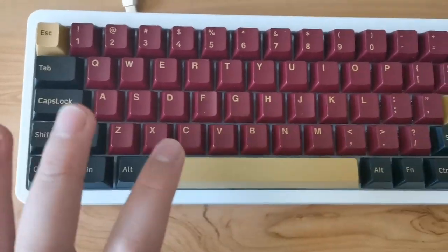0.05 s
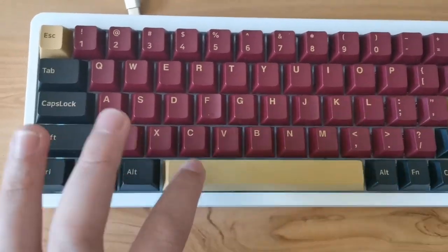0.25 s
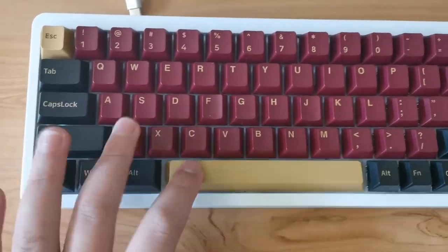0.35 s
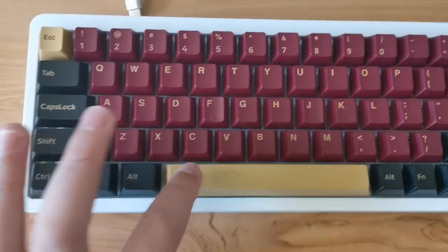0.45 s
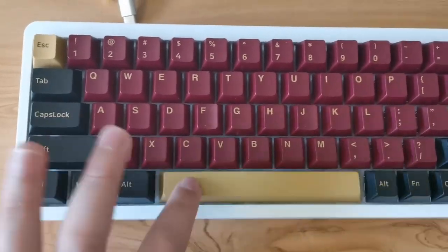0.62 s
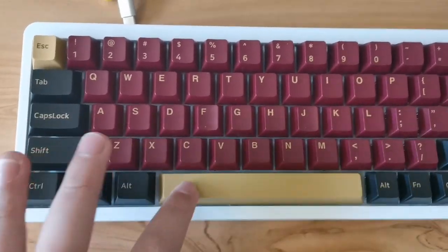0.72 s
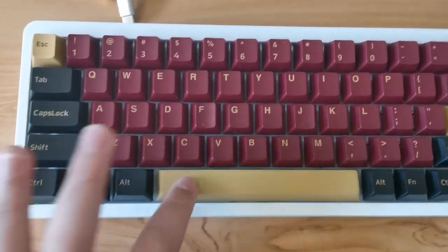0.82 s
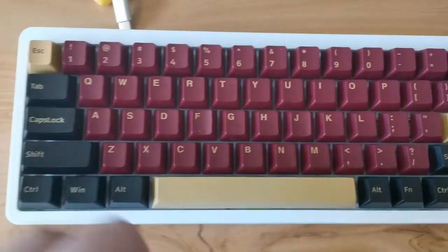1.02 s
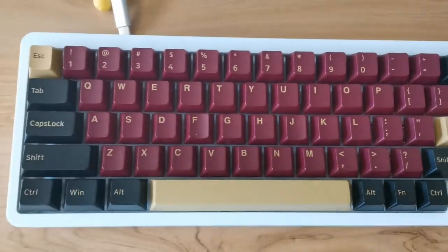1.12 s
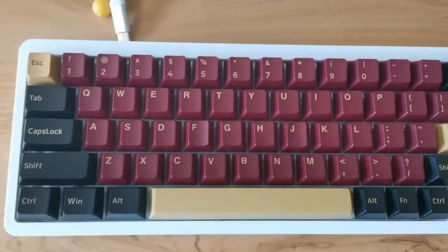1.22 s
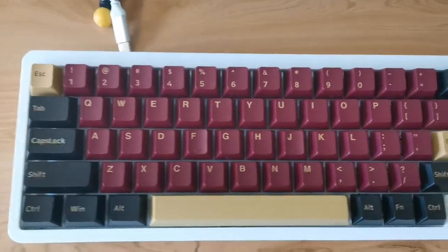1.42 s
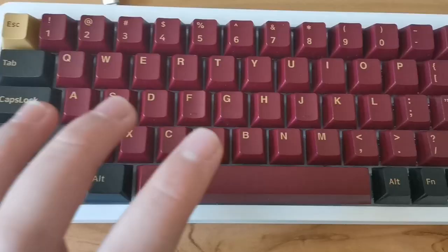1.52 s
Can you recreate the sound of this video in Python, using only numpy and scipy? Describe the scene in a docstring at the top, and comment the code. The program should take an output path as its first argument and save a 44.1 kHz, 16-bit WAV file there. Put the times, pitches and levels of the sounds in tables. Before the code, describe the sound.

A mechanical keyboard's spacebar is tapped four times, close to the microphone. Each press gives a sharp plastic clack with a slight desk thud, then a lighter click on release, in a small, quiet, slightly echoing room.

```python
"""A small live room rings out from an earlier tap, then a finger taps a keyboard's spacebar four times.
Each mechanical press, heard close up, ticks and bottoms out: a plastic crack, a short ring of bar,
plate and case, and a thud in the wooden desk. On each release the spring knocks the bar against its top
stop. Under it lies quiet room tone; as the hand lifts, skin brushes faintly and a soft low rush swells."""
import sys
import numpy as np
from scipy import signal
from scipy.fft import rfft, irfft
from scipy.io import wavfile

SR = 44100
rng = np.random.default_rng(int(sys.argv[2]) if len(sys.argv) > 2 else 0)


def waveform_to_disk(signal):
    """Save audio, clipped to [-1, 1], as 16-bit WAV at the path in sys.argv[1]."""
    frames = np.transpose(np.atleast_2d(signal))
    scaled = np.clip(frames, -1, 1) * 32767
    samples = np.round(scaled).astype(np.int16)
    wavfile.write(sys.argv[1], SR, samples)


N = 68355

# the bar bottoms out: (time [s], level [dB], brightness [dB/octave])
PRESSES = [(-.115, 1, -1), (0.2169, -2, 1), (0.4042, 0, 1), (0.698, -0.5, 0.5), (0.908, 0, 0.67)]
# the bar hits its top stop: (time [s], level [dB], brightness [dB/octave])
RELEASES = [(-.02, -1, 1), (0.3036, -0.5, -2), (0.5151, 0.5, -2.5), (0.8126, 1.5, -1.5), (1.0038, 3, -1)]
# ring of bar, plate and case:
# (frequency [Hz], t60 [s], press level [dB], release level [dB], left minus right [dB])
BODY_MODES = [(542, 0.034, -42, -48.5, 5), (683, 0.037, -28.5, -59, -2), (800, 0.033, -26.5, -44, -4.5),
              (914, 0.022, -32, -47.5, -17), (1103, 0.02, -19, -36, 0), (1358.4, 0.019, -17.5, -28.5, -8.5),
              (1491, 0.017, -15.5, -26, -10), (1758, 0.024, -18, -27, 3), (1924, 0.013, -22, -36.5, -15.5),
              (2143, .012, -20, -29, -14.5), (2525, 0.016, -23, -31, -4), (2900, 0.018, -22, -31, 7),
              (3517, 0.024, -36, -41.5, -4), (4485, 0.015, -33, -34.5, -6.5)]
# thud of the desk: (frequency [Hz], t60 [s], press level [dB], release level [dB])
DESK_MODES = [(95, 0.36, -53, -58.5), (132, 0.2, -52.5, -49.5), (216.5, 0.18, -43, -49),
              (265, 0.19, -47, -49.5), (330.4, 0.21, -43.5, -47)]
# crack of plastic on plastic: (frequency [Hz], relative level [dB])
CRACK_SPECTRUM = [(400, -27), (1000, -2.5), (2800, 1.5), (3600, -4.5), (4300, 1.5), (5300, -12.5),
                  (6000, -3.5), (7600, -7), (8600, -11.5), (10000, -5), (12500, -10.5), (16000, -26)]
# tick of the switch: (frequency [Hz], relative level [dB])
TICK_SPECTRUM = [(500, -24.5), (2200, -2.5), (4500, 0), (6500, -9.5), (12500, -7), (16000, -13.5)]
# colour of the reverb: (frequency [Hz], relative level [dB])
REVERB_SPECTRUM = [(80, -46), (250, -1), (450, -3), (800, -2.5), (1500, -4), (2400, 0), (2900, -0.5),
                   (3700, 1), (4800, 4), (6500, 3.5), (10000, -2), (15000, -10)]
# brushes of skin: (peak time [s], length [s], level [dB], centre [Hz], half-width [octaves])
BRUSHES = [(1.197, 0.096, -86, 11100, 0.13), (1.308, 0.052, -77, 11240, 0.34),
           (1.432, 0.059, -70.5, 4940, .04), (1.446, 0.0069, -67, 1770, 0.56),
           (1.466, 0.15, -81, 10500, 0.14)]
# soft low rush: (frequency [Hz], relative level [dB])
RUSH_SPECTRUM = [(30, 7), (70, 1.5), (190, -17.5), (255, 9.5), (390, -28.5), (520, -6.5), (980, 1),
                 (1300, -22), (3000, -12.5), (5000, -37.5), (14000, -52.5)]
# swell of the rush: (time [s], level [dB])
RUSH_SWELL = [(.95, -89.5), (1.15, -80), (1.26, -62), (1.35, -57), (1.5, -56.5)]
# steady room tone: (frequency [Hz], relative level [dB])
ROOM_TONE_SPECTRUM = [(25, -12), (60, -2.5), (110, -1.5), (190, -5.5), (260, 1.5), (400, -8.5), (600, -3),
                      (1200, -15), (2800, -21.5), (4000, -24.5), (7000, -34), (15000, -46.5)]

TICK_DB, TICK_LEAD_S, TICK_T60_S = -43, .0054, 0.043
PRESS_CRACK_DB, RELEASE_CRACK_DB, CRACK_T60_S, CRACK_PAN_DB = -24.5, -39.5, 0.018, 0.5
CRACK_FRESH = 0.49  # gain of the crack noise that is new on every hit
MODE_SCATTER_DB, MODE_DETUNE, DESK_DETUNE = .4, .004, .01  # random spread from hit to hit
RIGHT_LAG_S, LAG_FROM_HZ = 0.00036, 1190  # highs reach the right late; lows come from the whole case
RADIATION_HZ = 424  # the small bar radiates little below this
ATTACK_S, DESK_RISE_S = .00008, .01
TAIL_DB, TAIL_T60_S, TREBLE_T60_S, TAIL_PREDELAY_S, TAIL_BUILD_S = -8, 0.5, 0.51, 0.0046, .025
ECHO_DB, ECHO_S, ECHO_WIDTH_S = -9.5, 0.012, .003
ROOM_TONE_DB = -56.5
PREROLL_S, STOP_S, TOP_HZ = .2, 1.507, 16000


def spacebar(t):
    """All presses and releases; each kind of hit keeps its own grain of dense high modes."""
    out, size = np.zeros((2, len(t))), 2 ** 14
    for stroke, hits in ((press, PRESSES), (release, RELEASES)):
        grain = noise(CRACK_SPECTRUM, size)
        for start, db, brightness in hits:
            first = np.searchsorted(t, start - .01)  # open early for the tick
            span = slice(first, first + size)
            out[:, span] += undb(db) * stroke(t[span] - start, grain, brightness)
    return out


def press(t, grain, brightness):
    """The switch ticks faintly, then the bar lands."""
    tick = undb(TICK_DB) * noise(TICK_SPECTRUM, len(t)) * envelope(t + TICK_LEAD_S, TICK_T60_S)
    return tick + knock(t, grain, brightness, PRESS_CRACK_DB, level_column=0)


def release(t, grain, brightness):
    """The spring throws the bar back against its stop."""
    return knock(t, grain, brightness, RELEASE_CRACK_DB, level_column=1)


def knock(t, grain, brightness, crack_db, level_column):
    """One hit: ring and crack of the plastic, thin in the bass, over the thud of the desk."""
    plastic = body_ring(t, brightness, level_column) + crack(t, grain, crack_db + brightness)
    low_cut = signal.butter(2, RADIATION_HZ, "highpass", fs=SR, output="sos")
    return signal.sosfilt(low_cut, plastic) + desk_thud(t, level_column)


def body_ring(t, brightness, level_column):
    """Bar, plate and case ring in short modes of alternating polarity."""
    out = 0
    for k, (hz, t60, *levels, pan_db) in enumerate(BODY_MODES):
        tilt_db = brightness * np.log2(hz / 1500)
        db = levels[level_column] + tilt_db + MODE_SCATTER_DB * rng.standard_normal()
        lag = RIGHT_LAG_S / (1 + (LAG_FROM_HZ / hz) ** 4)
        mode = ring(lag_right(t, lag), hz * (1 + MODE_DETUNE * rng.standard_normal()), t60)
        out = out + (-1) ** k * undb(db) * pan(pan_db) * mode
    return out


def crack(t, grain, db):
    """Plastic meets plastic in a snap of noise: part repeating grain, part new."""
    burst = np.sqrt(1 - CRACK_FRESH ** 2) * grain + CRACK_FRESH * noise(CRACK_SPECTRUM, len(t))
    return undb(db) * pan(CRACK_PAN_DB) * burst * envelope(lag_right(t, RIGHT_LAG_S), CRACK_T60_S)


def desk_thud(t, level_column):
    """The desk's low modes bloom more slowly and outlast the plastic."""
    thud = sum(undb(levels[level_column]) * ring(t, hz * (1 + DESK_DETUNE * rng.standard_normal()), t60)
               for hz, t60, *levels in DESK_MODES)
    return thud * (1 - np.exp(-np.maximum(t, 0) / DESK_RISE_S))


def room(x):
    """The small room answers with a cluster of early reflections and a diffuse tail."""
    t = np.arange(2 ** 15) / SR
    wash = diffuse(noise(REVERB_SPECTRUM, len(t)), wide_hz=516)
    low = signal.sosfiltfilt(signal.butter(2, 5000, fs=SR, output="sos"), wash)
    tail = low * envelope(t, TAIL_T60_S) + (wash - low) * envelope(t, TREBLE_T60_S)
    tail *= np.clip((t - TAIL_PREDELAY_S) / TAIL_BUILD_S, 0, 1)
    echoes = diffuse(noise(REVERB_SPECTRUM, len(t)), wide_hz=503)
    echoes *= np.exp(-.5 * ((t - ECHO_S) / ECHO_WIDTH_S) ** 2)
    response = sum(undb(db) * part / np.sqrt(np.sum(part ** 2) / 2)
                   for db, part in ((TAIL_DB, tail), (ECHO_DB, echoes)))
    send = .5 * x.mean(axis=0) + .5 * x  # half the stereo width
    return signal.fftconvolve(send, response, axes=1)[:, :x.shape[1]]


def hand(t):
    """Skin brushes in faint swells of band noise as the hand moves away."""
    out = 0
    for when, length, db, hz, width in BRUSHES:
        band = [(hz * 2 ** (step * width), skirt_db)
                for step, skirt_db in ((-2, -40), (-1, -6), (0, 0), (1, -6), (2, -40))]
        swell = np.exp(-2 * ((t - when) / length) ** 2)
        out = out + undb(db) * noise(band, len(t)) * swell
    return out


def background(t):
    """Quiet room tone and a soft low rush that swells toward the end, both leaning right."""
    swell = undb(np.interp(t, *np.array(RUSH_SWELL).T))
    rush = swell * noise(RUSH_SPECTRUM, len(t))
    room_tone = undb(ROOM_TONE_DB) * noise(ROOM_TONE_SPECTRUM, len(t))
    return diffuse(room_tone + rush, wide_hz=940) * pan(db=-2.0)


def ring(t, hz, t60):
    """One struck mode: a dying sine."""
    return np.sin(2 * np.pi * hz * t) * envelope(t, t60)


def envelope(t, t60):
    """Sharp attack at t = 0, then a decay of 60 dB in t60 seconds."""
    t = np.maximum(t, 0)
    return (1 - np.exp(-t / ATTACK_S)) * np.exp(-np.log(1000) * t / t60)


def noise(spectrum, size):
    """Unrelated left and right noise of rms 1, coloured by the spectrum."""
    hz, db = np.array(spectrum).T
    f = np.maximum(np.fft.rfftfreq(size, 1 / SR), 1)
    colour = undb(np.interp(np.log(f), np.log(hz), db))
    x = irfft(rfft(rng.standard_normal((2, size))) * colour, size)
    return x / x.std()


def diffuse(x, wide_hz):
    """Pulls the bass toward mono and leaves the treble wide."""
    f = np.fft.rfftfreq(x.shape[1], 1 / SR)
    coherence = .9 / (1 + (f / wide_hz) ** 2)
    mid, side = rfft(x) * np.sqrt([1 + coherence, 1 - coherence]) / np.sqrt(2)
    return irfft(np.array([mid + side, mid - side]), x.shape[1])


def lag_right(t, seconds):
    """Left and right time axes, the right one late."""
    return t - np.array([[0], [seconds]])


def pan(db):
    """Stereo gains with the left louder by db."""
    return undb(np.array([[db], [-db]]) / 2)


def undb(db):
    """Decibels to gain."""
    return 10 ** (np.asarray(db) / 20)


def scene():
    """The spacebar in its room; the pre-roll holds the earlier tap, so only its tail is heard."""
    t = np.arange(-int(PREROLL_S * SR), N) / SR
    taps = spacebar(t)
    return (taps + room(taps))[:, -N:] + background(t[-N:]) + hand(t[-N:])


def record(dry):
    """A 3 ms fade to silence just before the end, and a steep high cut."""
    gate = np.clip((STOP_S - np.arange(N) / SR) / .003, 0, 1)
    high_cut = signal.ellip(8, .2, 70, TOP_HZ, fs=SR, output="sos")
    return signal.sosfilt(high_cut, dry * gate)


dry = scene()
out = record(dry)
waveform_to_disk(out)
```